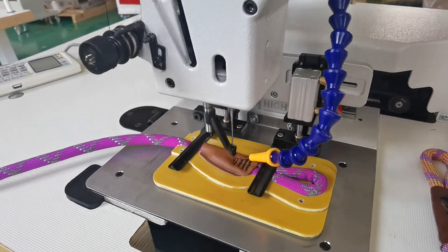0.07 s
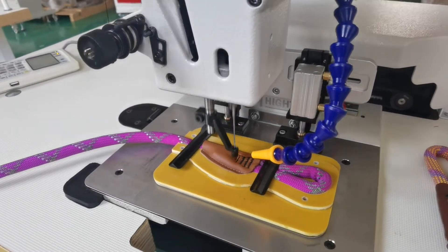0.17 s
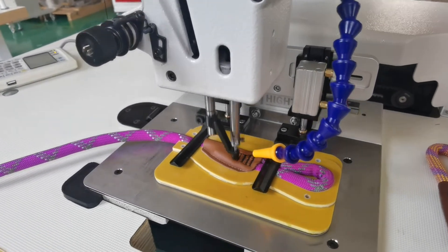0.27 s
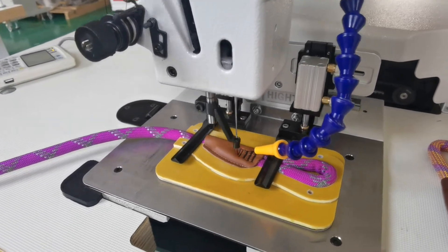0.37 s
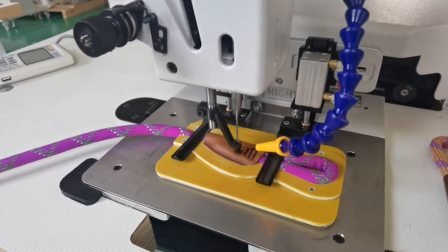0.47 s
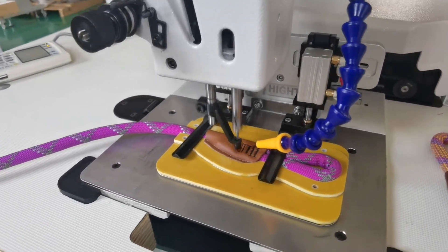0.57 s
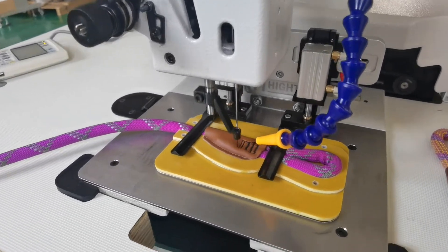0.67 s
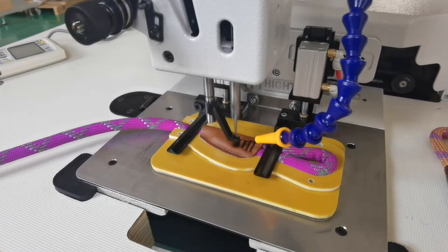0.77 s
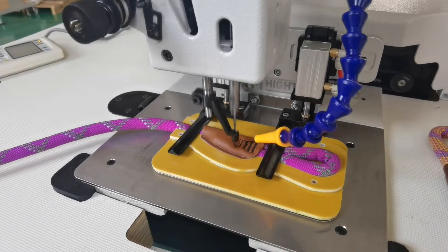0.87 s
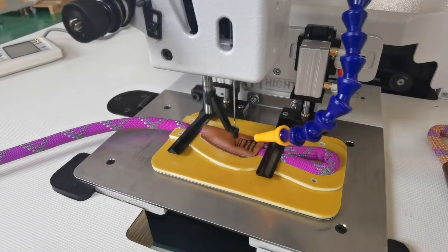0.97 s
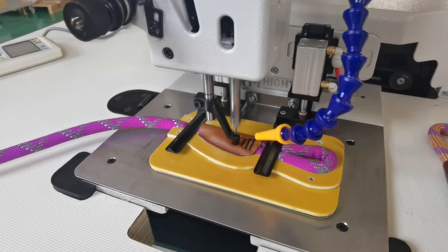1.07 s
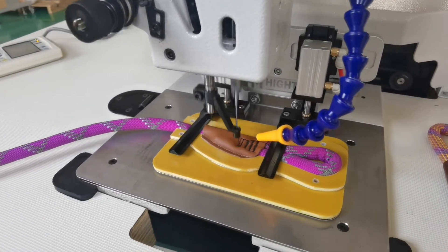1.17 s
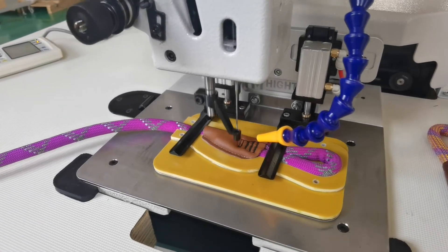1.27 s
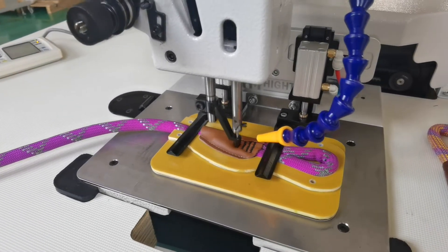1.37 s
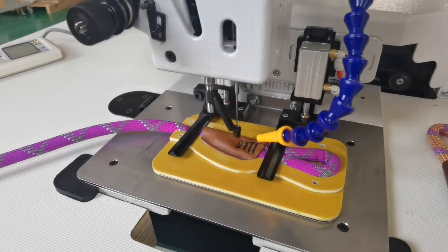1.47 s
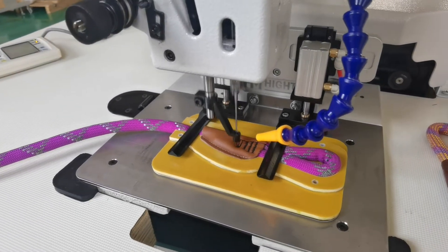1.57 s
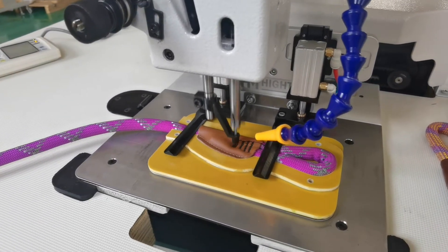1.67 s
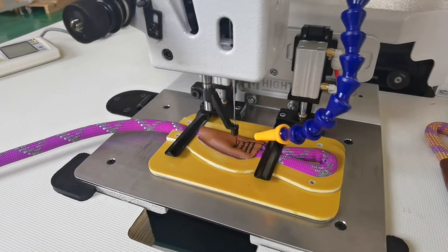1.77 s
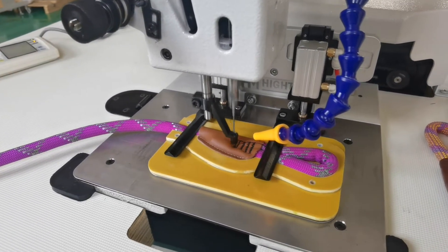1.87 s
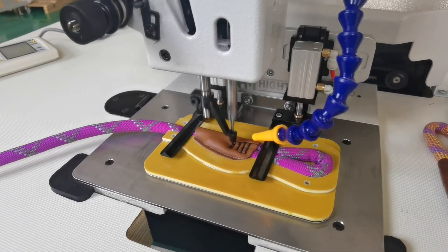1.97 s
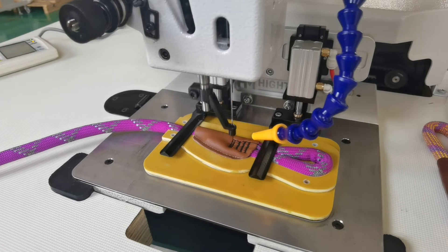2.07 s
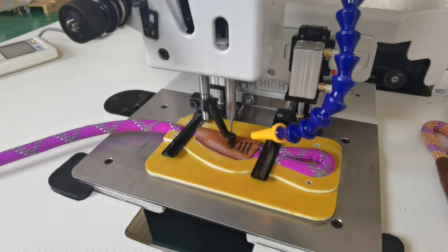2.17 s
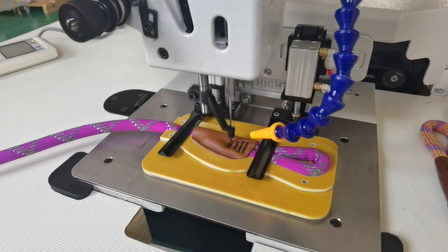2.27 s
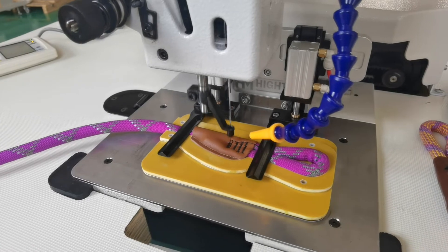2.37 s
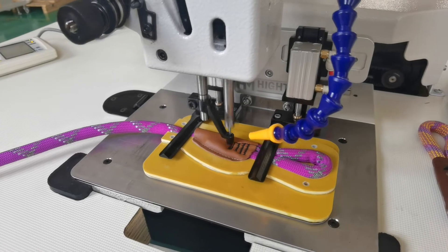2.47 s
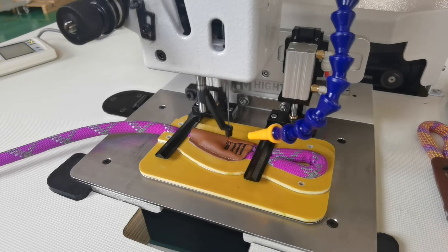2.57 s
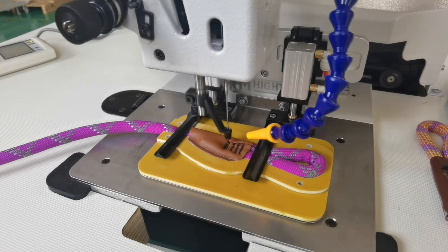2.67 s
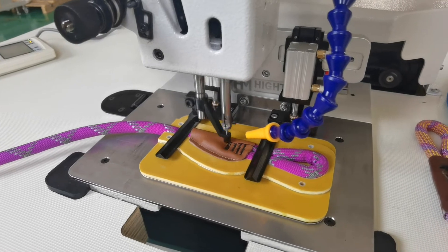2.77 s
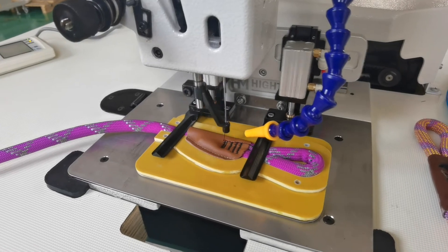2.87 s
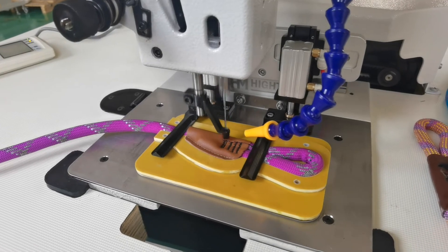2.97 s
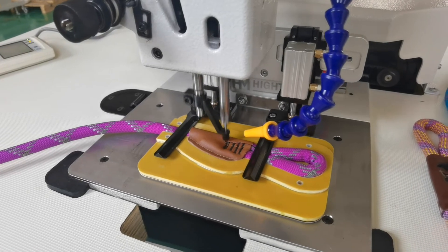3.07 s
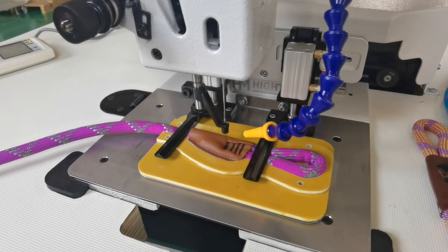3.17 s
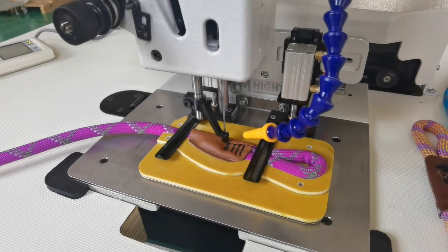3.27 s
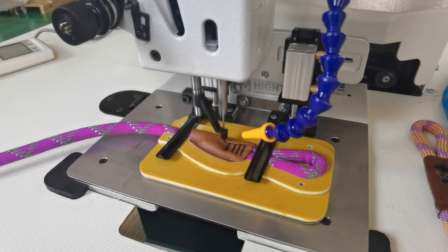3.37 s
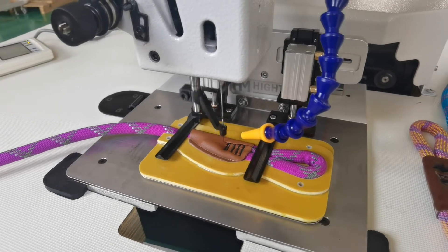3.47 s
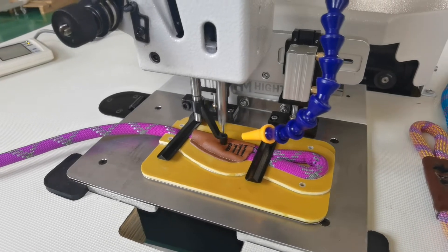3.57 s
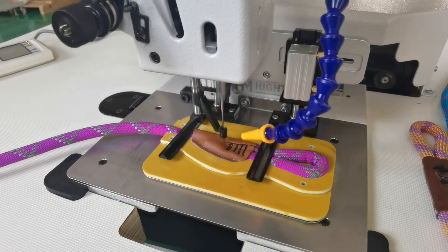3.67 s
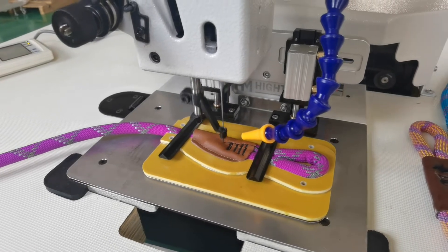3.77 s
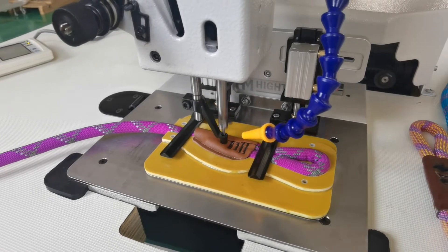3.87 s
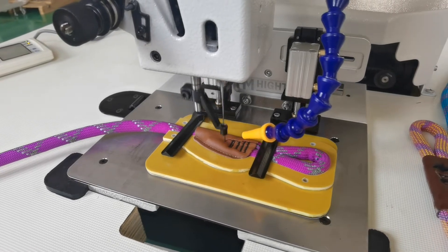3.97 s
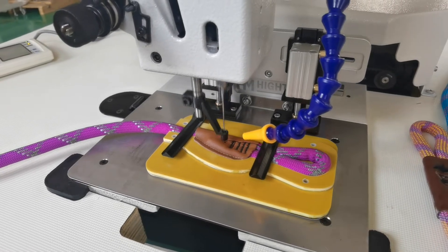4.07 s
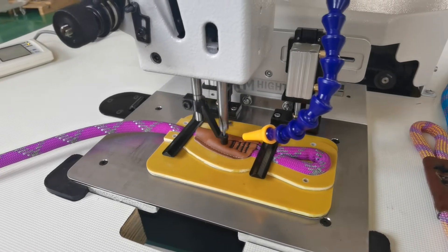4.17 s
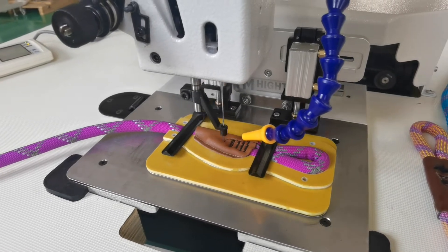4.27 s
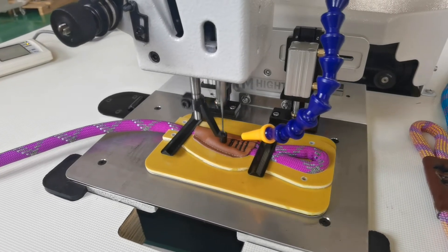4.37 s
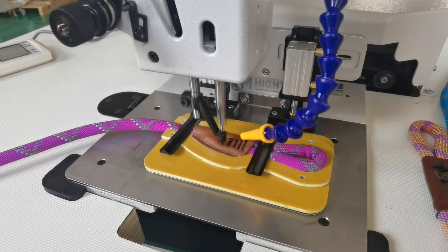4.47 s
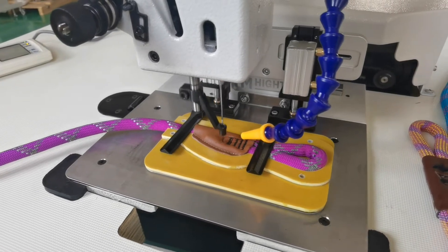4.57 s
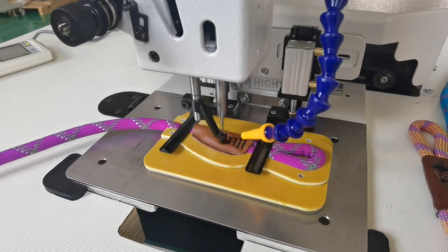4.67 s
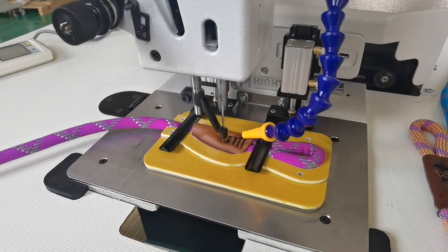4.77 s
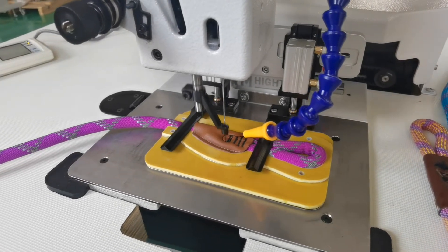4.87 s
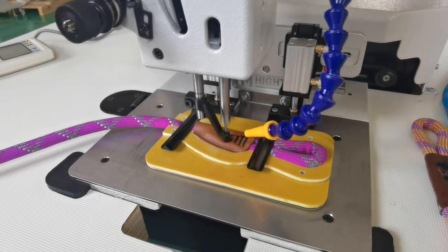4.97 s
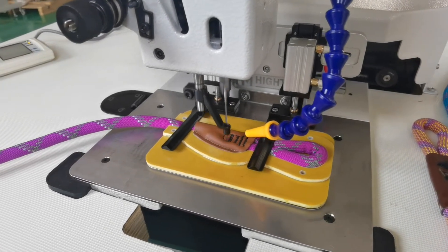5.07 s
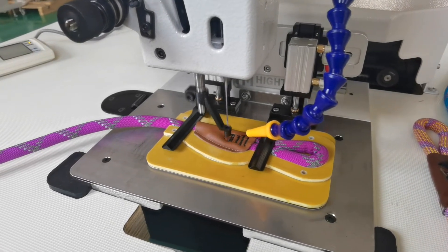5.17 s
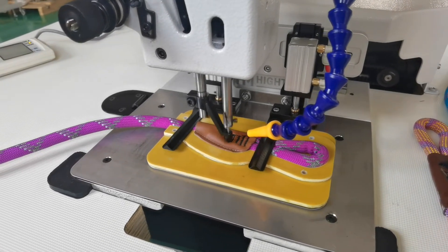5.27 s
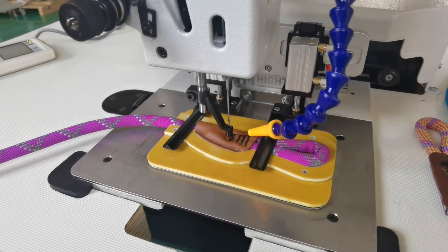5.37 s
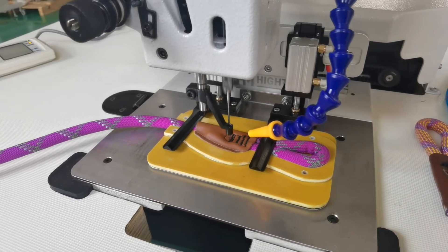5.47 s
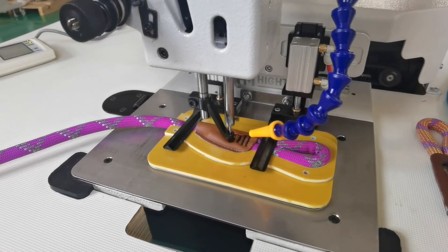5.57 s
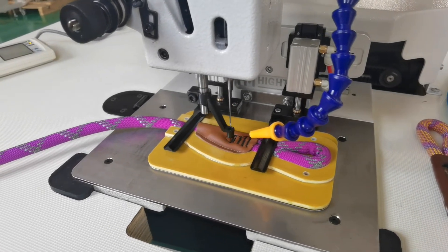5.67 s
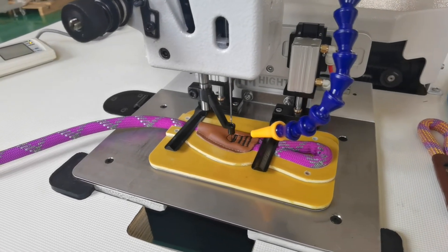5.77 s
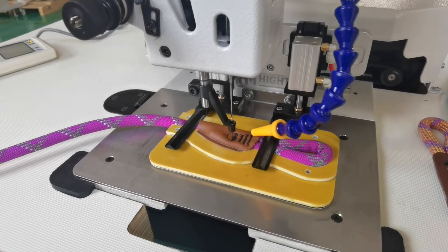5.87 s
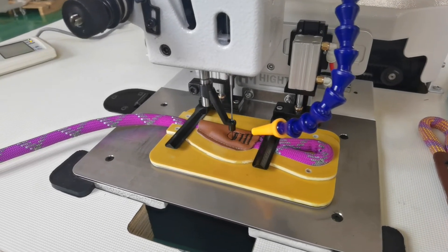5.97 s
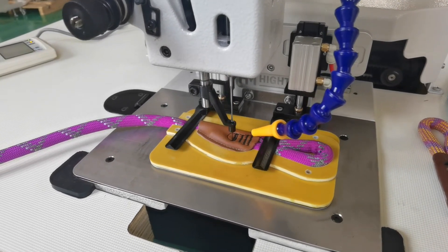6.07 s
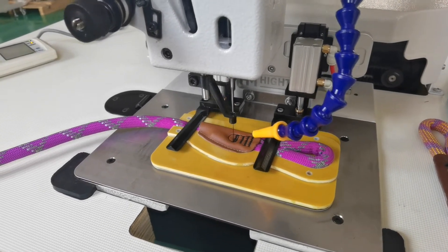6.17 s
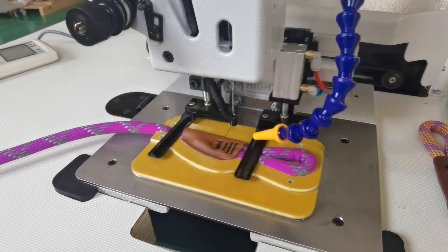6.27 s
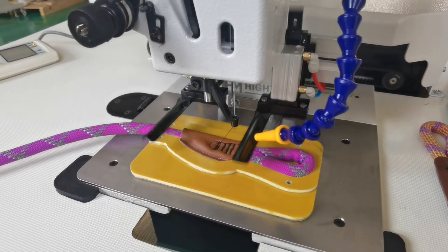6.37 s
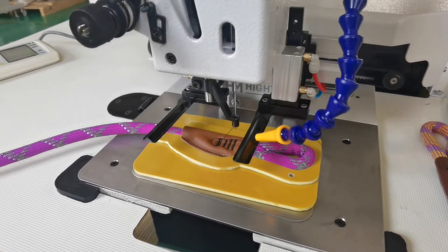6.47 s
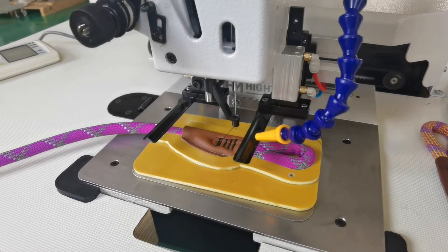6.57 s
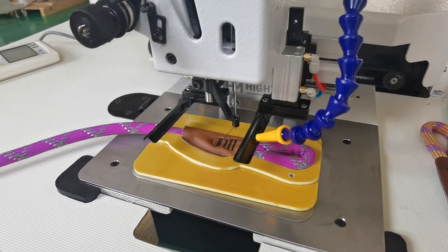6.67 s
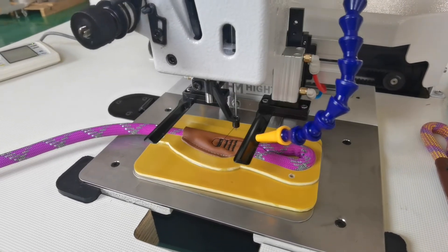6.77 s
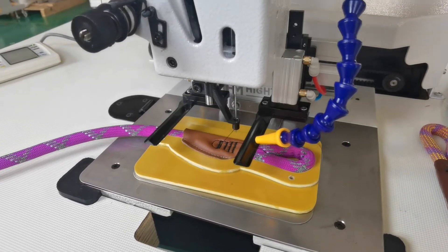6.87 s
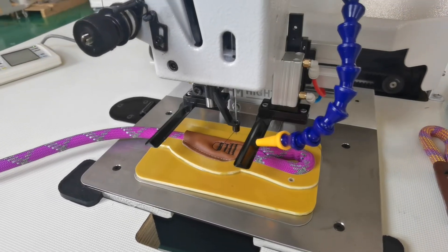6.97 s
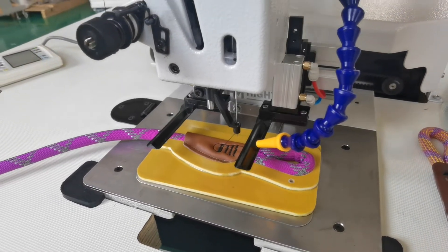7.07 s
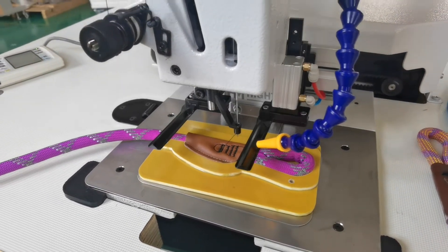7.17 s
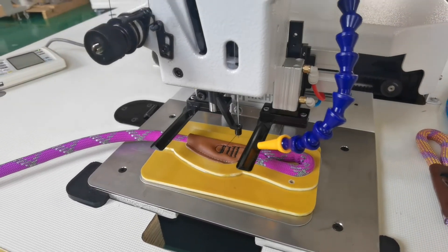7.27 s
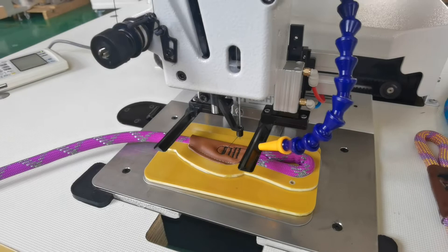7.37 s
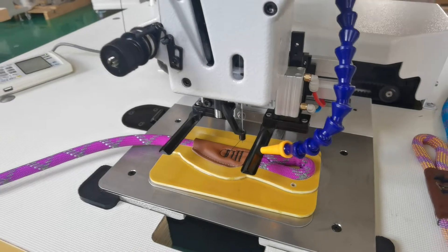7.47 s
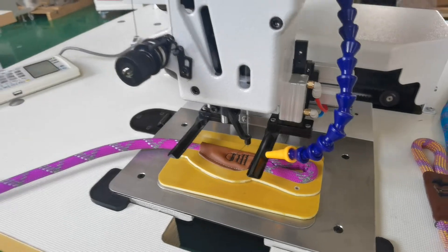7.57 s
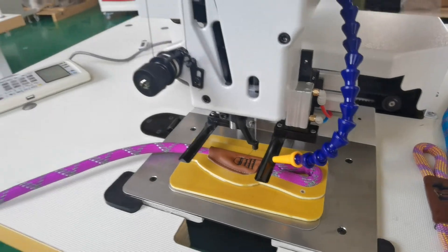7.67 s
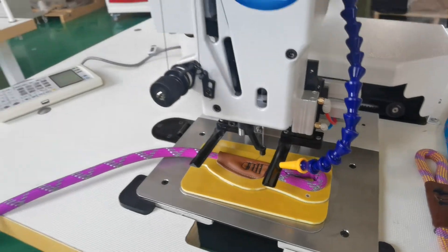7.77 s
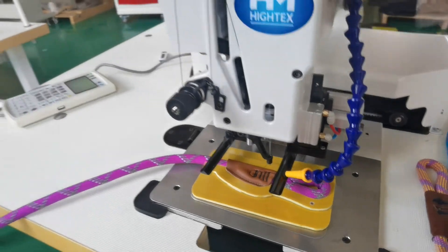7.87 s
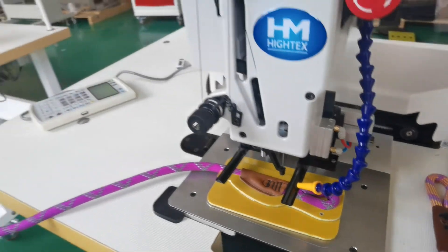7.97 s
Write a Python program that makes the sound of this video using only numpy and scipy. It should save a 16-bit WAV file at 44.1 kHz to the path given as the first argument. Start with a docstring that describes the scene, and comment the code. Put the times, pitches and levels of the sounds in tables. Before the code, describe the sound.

An industrial sewing machine clatters steadily over hissing air, then stops with sharp clicks and a puff of air.

```python
"""A sewing machine clatters close by, six and a half stitches a second through rope and leather.
Each stitch is a knock of the needle, two steel clacks and a snap of thread, over the hiss of a
cooling air jet that the moving foot chops twice a turn. The last stitch is slow; the thread is cut,
the feed slides the work back, the clamp jumps up and lets out its air, and the workshop rumbles on."""
import sys
import numpy as np
from scipy import signal
from scipy.fft import rfft, irfft, next_fast_len
from scipy.io import wavfile
from scipy.ndimage import uniform_filter1d

SR = 44100
rng = np.random.default_rng(int(sys.argv[2]) if len(sys.argv) > 2 else 0)


def dump_mix(stems):
    """Bounce the given channels to the path in sys.argv[1] as a 16-bit WAV at rate SR."""
    frames = np.atleast_2d(stems).T  # one column per channel
    limited = np.clip(frames, -1, 1)  # hard clip at full scale
    pcm = np.round(limited * 32767).astype(np.int16)
    wavfile.write(sys.argv[1], SR, pcm)


N = 353662
T = np.arange(N) / SR
FIRST_KNOCK_S, STITCH_S = .0675, .15518  # one stitch is one turn of the shaft
KNOCK_TIMES = FIRST_KNOCK_S + STITCH_S * np.arange(34)
CLACK_DECAY_S = .004


# the tone of small steel parts (frequency [Hz], level [dB])
STEEL_TONE = [(150, -25.5), (500, -13.5), (900, -19.5), (1300, -16), (2100, -8.5), (3300, -20.5),
              (3900, -17), (4700, -6), (5800, 2), (8300, 0.5), (10000, -5.5), (11500, -21), (15000, -20.5)]
# stitches where the thread catches and snaps hard (time [s], relative level [dB])
HARD_SNAPS = [(0.175, -10), (0.6414, -9.5), (0.7937, -11.5), (0.9493, -14.5), (1.7265, -9.5), (2.19, -8.5),
              (2.659, -12), (3.586, -8), (3.7405, -10.5), (3.897, -10.5), (4.0532, -10), (4.5138, -9.5)]
def thread_snaps(place_in_turn=.705, usual_db=-22, hard_trim_db=-4.5, jitter_s=.0025, scatter_db=2.2):
    """The thread snaps tight on its guides once a turn, a bit early or late; sometimes it catches."""
    snaps = [(s, db + hard_trim_db, CLACK_DECAY_S) for s, db in HARD_SNAPS]
    for s in times_at(place_in_turn):
        late, strong = rng.standard_normal(2)
        if all(abs(s - caught) > STITCH_S / 2 for caught, _ in HARD_SNAPS):
            db = usual_db + .85 * start_boost_db(s) - 3 * braking(s) + scatter_db * strong
            snaps.append((s + jitter_s * late, db, CLACK_DECAY_S))
    envelope = impacts(snaps, hold_s=.0042)
    return shaped_noise(envelope, STEEL_TONE, ring=.92, left=1.15, grit_db=1, flutter_db=.5)


# two clacks of the levers, then three light ticks of the hook that catches the thread
# (place after the knock [turns], relative level [dB], contact time [s])
STEEL_CONTACTS = [(.453, -15.5, .002), (.517, -20, 0.0076), (0.0309, -32, 0.0015), (.258, -28, 0.0013),
                  (.308, -39, 0.0012)]
def steel_clacks(scatter_db=1.3):
    """Steel parts meet at the same places in every turn, more softly once the shaft has slowed."""
    envelope = np.zeros(N)
    for place, db, contact_s in STEEL_CONTACTS:
        scatter = scatter_db * rng.standard_normal(len(KNOCK_TIMES) + 1)
        hits = [(s, db + .97 * start_boost_db(s) - 4.8 * braking(s) + chance_db, CLACK_DECAY_S)
                for s, chance_db in zip(times_at(place), scatter)]
        envelope += impacts(hits, hold_s=contact_s)
    return shaped_noise(envelope, STEEL_TONE, ring=1, left=1.25, grit_db=1.5, flutter_db=3)


# the notes of the bed, the plate under the needle (pitch [Hz], level [dB], time to fade by 60 dB [s])
BED_NOTES = [(345.7, -4, 0.14), (499, -4.5, 0.033), (621, 0.5, 0.051), (806, -7.5, 0.1), (1063, -1, 0.038),
             (1111, -5.5, 0.032), (1247, -6.5, 0.076), (2042, 4.5, 0.021), (2190, -8.5, 0.024),
             (2728, -5, 0.068)]
# the blows that make up one knock (delay [s], relative level [dB])
KNOCK_BLOWS = [(-.013, -5.5), (0, 0.5), (.005, -2), (.031, -37.5), (.082, -7)]
# how hard the needle punches through the leather (time [s], relative level [dB])
NEEDLE_FORCE = [(.8, -30), (3.2, -35), (4.4, -32), (5.2, -33.5)]
def needle_knocks(trim_db=-1, scatter=.42, detune=.007, jitter_s=.00053):
    """The needle and foot strike the bed and make it ring, never twice quite alike."""
    t, out = np.arange(6000) / SR, np.zeros((2, N))
    hz, db, fade_s = np.transpose(BED_NOTES)
    sides = amp(side_db(hz))
    for s in KNOCK_TIMES:
        pitch = hz * (1 + detune * rng.standard_normal(len(hz)))
        notes = np.sin(2 * np.pi * pitch[:, None] * t) * amp(db[:, None] - 60 * t / fade_s[:, None])
        for delay, blow_db in KNOCK_BLOWS:
            strengths = sides * (1 + scatter * rng.standard_normal((2, len(hz))))
            ringing = amp(curve(NEEDLE_FORCE, s) + blow_db + trim_db) * (strengths @ notes)
            at = s + delay + jitter_s * rng.standard_normal()
            for side in range(2):
                add(out[side], at, ringing[side])
    bass_cut = signal.butter(2, 200, "high", fs=SR, output="sos")  # the knocks carry nothing below 200 Hz
    return signal.sosfilt(bass_cut, out)


# the tone of the cooling air (frequency [Hz], level [dB])
JET_TONE = [(200, -33.5), (800, -16.5), (1500, -16), (2300, -10.5), (3300, -6), (3900, -10), (4800, -7.5),
            (5800, 1.5), (6900, -3.5), (8300, 4), (9000, -7.5), (10000, -5), (11500, -12.5), (15000, -20)]
# where the foot blocks the jet (place after the knock [turns], width [turns], level change [dB])
JET_DIPS = [(.14, .13, -4.5), (0.623, 0.043, -12.5)]
def air_jet(hiss_db=-24.5, rub_db=-25.5, shut_s=5.99, fade_s=.092):
    """Air hisses, dips as the foot passes and dies away when its valve shuts; a short puff follows."""
    turns = curve(shaft())
    dip_db = sum(db * np.exp(-(((turns - place + .5) % 1 - .5) / width) ** 2)
                 for place, width, db in JET_DIPS)
    strength = amp(start_boost_db(T) + dip_db) * np.exp(-np.maximum(T - shut_s, 0) / fade_s)
    puff = amp(-37) * burst(start=6.15, rise=.029, hold=.005, decay=.021)
    airflow = strength * amp(hiss_db + .5 * braking(T)) + puff
    rubbing = strength * amp(rub_db - 20 * braking(T))  # hook and thread rub in the same rhythm
    hiss = shaped_noise(airflow, JET_TONE, ring=.84, left=.62, grit_db=1, flutter_db=3.9)
    return hiss + shaped_noise(rubbing, STEEL_TONE, ring=.76, left=.81, grit_db=3, flutter_db=3.9)


# the tone of the needle scraping through rope (frequency [Hz], level [dB])
ROPE_TONE = [(300, -22), (1300, -12), (2200, -1), (3400, -6), (7000, -34)]
def rope_rasp(level_db=-43):
    """The needle rasps in the rope, most in the first stitches; it stops as the shaft brakes."""
    envelope = amp(level_db + 2.8 * start_boost_db(T)) * (1 - braking(T))
    return shaped_noise(envelope, ROPE_TONE, ring=.9, left=1, grit_db=2, flutter_db=5)


# the hits of cutter and clamp (time [s], level [dB], decay [s], weight [0 thin steel to 1 heavy frame])
STOP_HITS = [(6.032, -27.5, 0.0044, 0.1), (6.041, -18, 0.0072, 1), (6.059, -36, 0.035, .95),
             (6.304, -26.5, 0.0019, 0.3), (6.310, -25, 0.0084, 0), (6.328, -12.5, 0.0019, 0),
             (6.334, -15.5, 0.013, 0.37), (6.353, -18, 0.0017, 0)]
# the tone of the heavy frame (frequency [Hz], level [dB])
FRAME_TONE = [(150, -26), (1300, -4), (1800, -7), (2600, -0.5), (4300, -5), (7000, -2), (15000, -38)]
# pitches at which the clamp rings (pitch [Hz], width [Hz], boost at ring=1 [dB])
CLAMP_PEAKS = [(1290, 120, 6.5), (2150, 150, 7.5), (2400, 120, 4.5), (3200, 160, 6), (4060, 220, 9)]
def cutter_and_clamp():
    """The cutter and clamp hit their stops; thin steel and heavy frame share each hit's energy."""
    thin, heavy = [], []
    for s, db, decay, weight in STOP_HITS:
        thin.append((s, db + 10 * np.log10(max(1 - weight, .01)), decay))
        heavy.append((s, db + 10 * np.log10(max(weight, .01)), decay))
    click = shaped_noise(impacts(thin, hold_s=.0025), STEEL_TONE, ring=.2, left=.26, grit_db=2.5)
    clunk = shaped_noise(impacts(heavy, hold_s=.0021), FRAME_TONE,
                         ring=1.2, left=.51, grit_db=-.5, peaks=CLAMP_PEAKS)
    return click + clunk


# the tone of air leaving the clamp's cylinder (frequency [Hz], level [dB])
VENT_TONE = [(150, -34), (400, -3), (2100, -3.5), (3000, -13), (4100, -1), (8300, -2.5), (10000, -12),
             (15000, -26.5)]
def clamp_vent(level_db=-29):
    """The cylinder that moves the clamp blows off its air in one short breath."""
    envelope = amp(level_db) * burst(start=6.29, rise=.098, hold=.0088, decay=.048)
    return shaped_noise(envelope, VENT_TONE, ring=.55, left=.2, grit_db=-3, peaks=CLAMP_PEAKS)


# the tone of the hollow gap under the foot (frequency [Hz], level [dB])
GAP_TONE = [(1700, -30), (2900, -4.5), (4200, -14.5), (5900, 0.5), (9000, -1.5), (15000, -22.5)]
def gap_whistle(level_db=-23):
    """A hollow gap gives a breathy whistle in the jet while the foot rises."""
    envelope = amp(level_db) * burst(start=5.812, rise=.018, hold=.11, decay=.022)
    return shaped_noise(envelope, GAP_TONE, left=.62, flutter_db=2.5)


# the tone of the motors, both in the feed and under the table (frequency [Hz], level [dB])
MOTOR_TONE = [(80, -37.5), (170, 1.5), (260, -0.5), (470, -3.5), (1200, -11.5), (3000, -56)]
def feed_return(hz=280, groan_db=-44.5, motor_db=-45):
    """The feed motors groan unevenly as they slide the work back to its start."""
    moving = burst(start=5.87, rise=.02, hold=.408, decay=.012)
    speed = burst(start=5.85, rise=.21, hold=.049, decay=.13)
    groan_tone = [(hz / 4, -50), (hz / 1.5, -4), (hz, 0), (hz * 1.3, -14), (hz * 4, -50)]
    groan = shaped_noise(amp(groan_db) * moving, groan_tone, flutter_db=3)
    return groan + shaped_noise(amp(motor_db) * moving * speed, MOTOR_TONE, left=.8, flutter_db=1)


# how hard the motors work (time [s], relative level [dB])
MOTOR_LOAD = [(0.0, -40.5), (3.25, -44), (4.86, -41.5), (5.6, -54), (5.7, -55)]
def motor_drone(trim_db=-.2):
    """The motors under the table drone while they sew, then drop to idling."""
    return shaped_noise(amp(curve(MOTOR_LOAD) + trim_db), MOTOR_TONE, left=.8, flutter_db=3.5)


def drive_whine(hz=4802, level_db=-69):
    """The motor drive sings one thin note that fades out near the end."""
    fade = np.interp(T, [7.3, 7.9], [1, 0])
    return amp(level_db) * fade * np.sqrt(2) * np.sin(2 * np.pi * hz * T + wander(120))


# how the rumble rises and falls (time [s], relative level [dB])
RUMBLE_LEVELS = [(0.0, -54), (0.24, -41), (2.03, -47.5), (4.81, -42), (5.68, -48), (6.13, -36), (6.66, -54),
                 (7.53, -40), (8.0, -41)]
# the tone of the rumble (frequency [Hz], level [dB])
RUMBLE_TONE = [(20, -32.5), (45, -34), (85, -2), (120, 3), (160, -6), (400, -39), (900, -77)]
def table_rumble(trim_db=-.3):
    """The table and workshop shake with a deep rumble."""
    return shaped_noise(amp(curve(RUMBLE_LEVELS) + trim_db), RUMBLE_TONE, left=1)


# thuds after the stitching (time [s], peak level [dB])
BUMPS = [(6.009, -35), (6.079, -30), (6.21, -30), (6.459, -34), (6.856, -34.5), (7.221, -29.5),
         (7.486, -32.5)]
def soft_bumps(hz=112, decay_s=.013):
    """Each bump is a low note that swells and dies within a few waves."""
    t, out = np.arange(8192) / SR, np.zeros(N)
    bump = t / decay_s * np.exp(1 - t / decay_s) * np.sin(2 * np.pi * hz * t)
    for s, db in BUMPS:
        add(out, s, amp(db) * bump)
    return out


# the tone of the workshop's background noise (frequency [Hz], level [dB])
SHOP_TONE = [(88, -40.5), (150, -7.5), (270, -6.5), (434, -18), (1460, -20), (2180, -19), (3310, -28.5),
             (5900, -23), (8400, -31), (11000, -50), (15000, -67)]
# the whir of a fan (pitch [Hz], width [Hz], boost at ring=1 [dB])
FAN_PEAK = [(2140, 240, 8.5)]
def shop_air(level_db=-48.5):
    """A soft wash of noise fills the workshop, with a fan whirring in it."""
    return shaped_noise(amp(level_db), SHOP_TONE, ring=.5, left=-.1, peaks=FAN_PEAK, flutter_db=1.9)


# the tone of the dull rush (frequency [Hz], level [dB])
RUSH_TONE = [(60, -29), (130, -19), (200, 10), (330, -6), (800, -1.5), (1200, -11), (2300, -19),
             (8000, -36), (15000, -65)]
def dull_rush(peak_db=-39, peak_s=7.99, rise_db_per_s=32):
    """A dull rushing sound swells up at the very end."""
    return shaped_noise(amp(peak_db - rise_db_per_s * np.maximum(peak_s - T, 0)), RUSH_TONE)


def shop_hum(hz=125.9, level_db=-49):
    """A low, steady hum wavers slightly in pitch."""
    return amp(level_db) * np.sqrt(2) * np.sin(2 * np.pi * hz * T + .5 * wander(40))


# how long the room rings (frequency [Hz], time to fade by 60 dB [s])
ROOM_FADE = [(1000, 0.41), (4000, 0.7), (15000, 0.113)]
def room_echo(sound, build_s=.01):
    """The room answers with a smooth tail of echoes whose highest part dies first."""
    hz, t, noise = signal.stft(rng.standard_normal((2, 32768)), SR, nperseg=256)
    tail = signal.istft(noise * amp(-60 * t / at_hz(ROOM_FADE, hz)[:, None]), SR, nperseg=256)[1]
    tail *= np.minimum(np.arange(tail.shape[1]) / SR / build_s, 1)
    return signal.fftconvolve(sound.mean(0)[None], tail / np.linalg.norm(tail[0]), axes=1)[:, :N]


# the shaft slows, makes one more stitch and parks (time [s], position after the last knock [turns])
SLOWDOWN = [(5.298, .453), (5.322, 0.61), (5.35, 0.62), (5.362, 0.77), (5.499, 1.14), (5.589, 1.453),
            (5.608, 1.615)]
def shaft():
    """The main shaft holds its speed, then brakes; gives rows of (time [s], position [turns])."""
    last = len(KNOCK_TIMES) - 1
    steady = [(FIRST_KNOCK_S - STITCH_S, -1), (KNOCK_TIMES[-1], last)]
    return np.array(steady + [(s, last + turns) for s, turns in SLOWDOWN])


def times_at(place):
    """The times at which the shaft passes one place in its turn."""
    times, turns = shaft().T
    at = np.interp(np.arange(place - 1, turns[-1]), turns, times)
    return at[at > 0]


def start_boost_db(t, boost_db=3.5, ease_s=2.44):
    """The first stitches are louder, then ease off."""
    return boost_db * np.maximum(1 - t / ease_s, 0)


def braking(t, brake_s=.13):
    """0 at full speed, 1 once the shaft has slowed."""
    return np.clip((t - KNOCK_TIMES[-1]) / brake_s, 0, 1)


# how the needle plate and machine head ring (pitch [Hz], width [Hz], boost at ring=1 [dB])
PLATE_PEAKS = [(1969, 19, 11.5), (3502, 32, 9.5), (5410, 270, -4.5), (6393, 88, 11), (8400, 220, 3)]
def shaped_noise(envelope, tone, ring=0., left=0., grit_db=0., peaks=PLATE_PEAKS, flutter_db=None):
    """Noise follows a loudness outline and rings through a body; ring scales its peaks, left pans it."""
    hz = np.fft.rfftfreq(4096, 1 / SR)
    peaks_db = sum(boost / (1 + (2 * (hz - f) / width) ** 2) for f, width, boost in peaks)
    body_db = at_hz(tone, hz) + ring * peaks_db + left * side_db(hz)
    # fold the filter in time so that the body rings only after a hit, never before
    cepstrum = irfft(np.log(amp(body_db)))
    cepstrum[:, 1:2048] *= 2
    cepstrum[:, 2049:] = 0
    body = irfft(np.exp(rfft(cepstrum)))
    body /= np.sqrt(np.sum(body ** 2) / 2)
    noise = stereo_noise()
    if flutter_db is not None:
        noise = flutter(noise, flutter_db)
    clumps = unit(uniform_filter1d(rng.standard_normal(N), size=30))
    grit = unit(amp(grit_db * clumps))  # tiny contacts come in clumps
    return signal.oaconvolve(noise * grit * envelope, body, axes=1)[:, :N]


# how alike the two sides sound (frequency [Hz], likeness [-1 opposite to 1 the same])
SIDE_LIKENESS = [(30, 0.023), (100, 0.93), (500, 0.95), (1200, -0.17), (6000, -0.079)]
def stereo_noise():
    """Left and right noise, nearly the same in the low notes and unrelated in the high ones."""
    size = next_fast_len(N)
    left, other = rfft(rng.standard_normal((2, size)))
    alike = at_hz(SIDE_LIKENESS, np.fft.rfftfreq(size, 1 / SR))
    right = alike * left + np.sqrt(1 - alike ** 2) * other
    return irfft(np.array([left, right]), size)[:, :N]


# how much louder the left side is (frequency [Hz], left minus right [dB])
LEFT_LEAD = [(100, -1), (400, 0.5), (1200, 3.5), (2200, 9), (6400, 7), (15000, 2)]
def side_db(hz):
    """Turns one side up and the other down by the same amount."""
    return at_hz(LEFT_LEAD, hz) * np.array([[.5], [-.5]])


def flutter(noise, depth_db):
    """A random shimmer: patches of noise, a few hundred Hz wide and tens of ms long, swell and fade."""
    spectrum = signal.stft(noise, nperseg=512)[2]
    patches = uniform_filter1d(rng.standard_normal(spectrum.shape[1:]), size=3, axis=0)
    patches = unit(uniform_filter1d(patches, size=5, axis=1))
    return unit(signal.istft(spectrum * amp(depth_db * patches), nperseg=512)[1][:, :N])


def impacts(hits, hold_s, rise_s=.000438):
    """Loudness outline of hits (time [s], level [dB], decay [s]): parts touch briefly, then let go."""
    t, out = np.arange(4096) / SR, np.zeros(N)
    for s, db, decay in hits:
        add(out, s, amp(db) * np.minimum(t / rise_s, 1) * np.exp(-np.maximum(t - hold_s, 0) / decay))
    return out


def burst(start, rise, hold, decay):
    """A loudness outline that rises, holds and dies away; all in seconds."""
    return np.clip((T - start) / rise, 0, 1) * np.exp(-np.maximum(T - start - rise - hold, 0) / decay)


def wander(points):
    """A slow random drift."""
    return np.interp(T, np.linspace(0, T[-1], points), rng.standard_normal(points))


def add(mix, s, sound):
    """Mixes a sound in at time s."""
    part = mix[max(round(s * SR), 0):][:len(sound)]
    part += sound[:len(part)]


def amp(db):
    """Decibels to gain."""
    return 10 ** (np.asarray(db) / 20)


def unit(x):
    """Scales to an average power of 1."""
    return x / np.sqrt(np.mean(x ** 2) + 1e-20)


def curve(rows, t=T):
    """Joins rows by straight lines."""
    return np.interp(t, *np.transpose(rows))


def at_hz(rows, hz):
    """Reads a table between its frequencies, with octaves evenly spaced."""
    f, value = np.transpose(rows)
    return np.interp(np.log(hz + 1), np.log(f + 1), value)


def scene(echo_db=-12):
    """The machine close by, in its workshop."""
    machine = air_jet() + gap_whistle() + rope_rasp() + steel_clacks() + thread_snaps() + needle_knocks()
    machine += cutter_and_clamp() + clamp_vent() + feed_return()
    echo = amp(echo_db) * room_echo(machine)
    background = table_rumble() + motor_drone() + shop_air() + dull_rush() + shop_hum() + soft_bumps()
    return machine + echo + background + drive_whine()


def record(dry, ceiling=.85, top_hz=15950):
    """Rounds off the loudest peaks and removes the very highest treble."""
    rounded = dry / (1 + (dry / ceiling) ** 6) ** (1 / 6)
    treble_cut = signal.firwin(511, top_hz, window=("kaiser", 9), fs=SR)
    return signal.oaconvolve(rounded, treble_cut[None], "same")


dry = scene()
out = record(dry)
dump_mix(out)
```